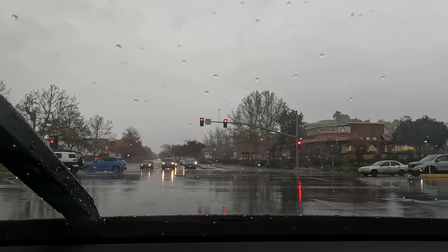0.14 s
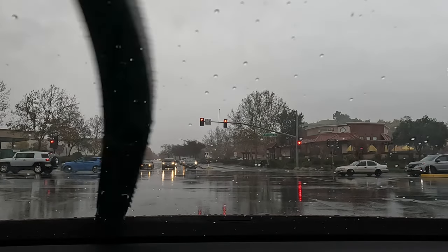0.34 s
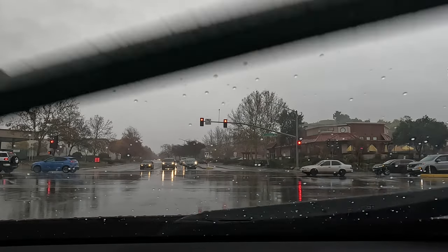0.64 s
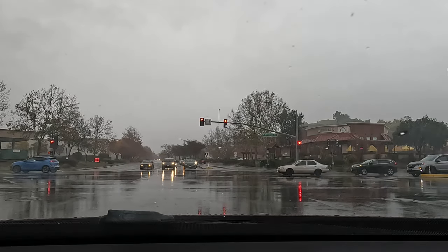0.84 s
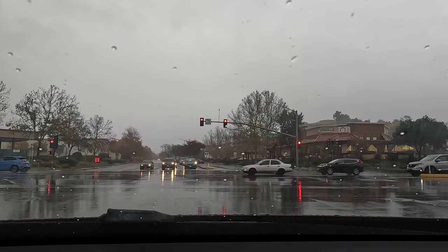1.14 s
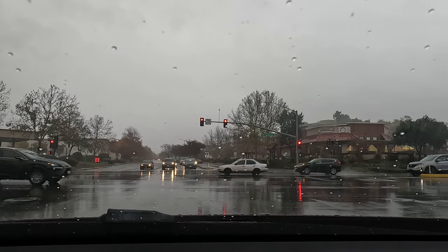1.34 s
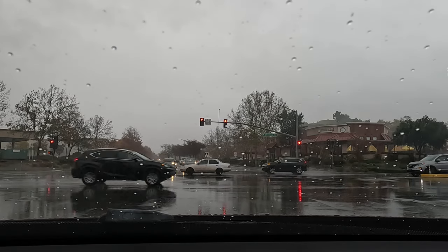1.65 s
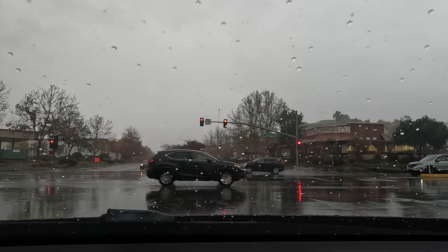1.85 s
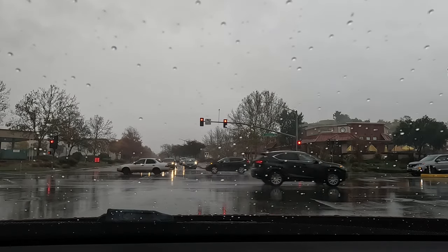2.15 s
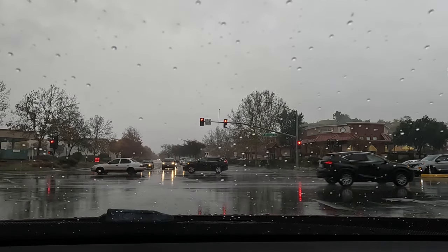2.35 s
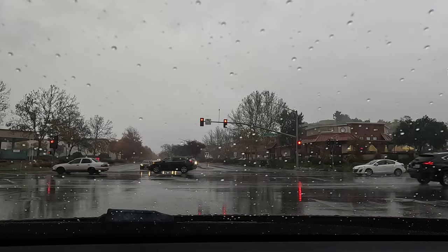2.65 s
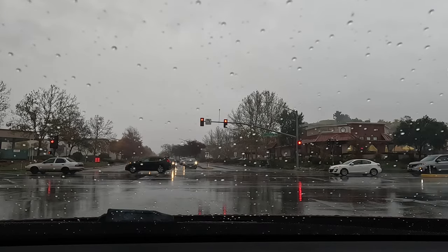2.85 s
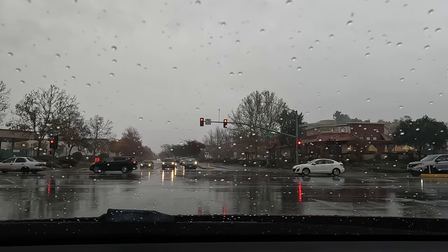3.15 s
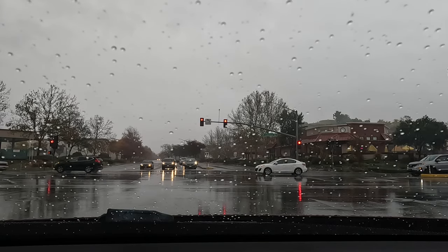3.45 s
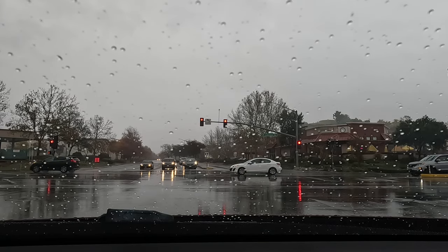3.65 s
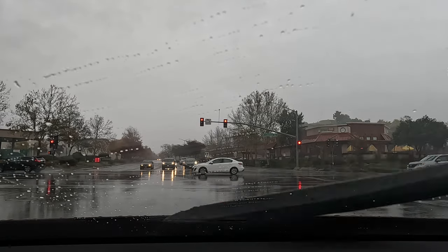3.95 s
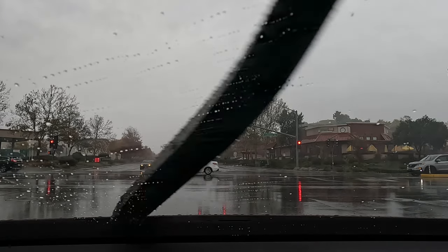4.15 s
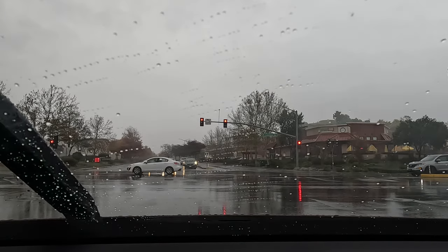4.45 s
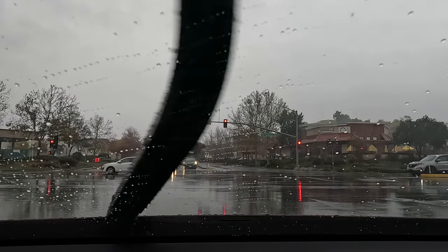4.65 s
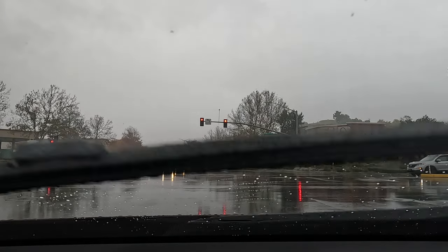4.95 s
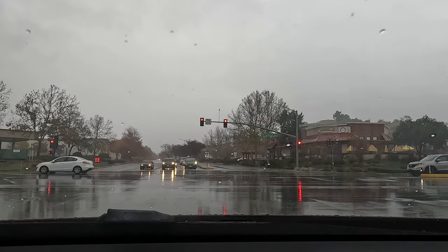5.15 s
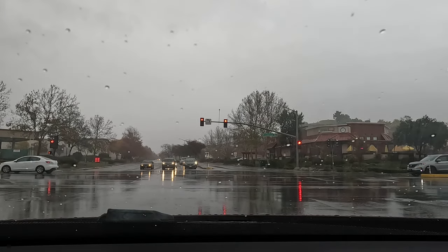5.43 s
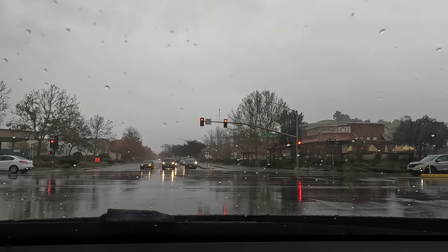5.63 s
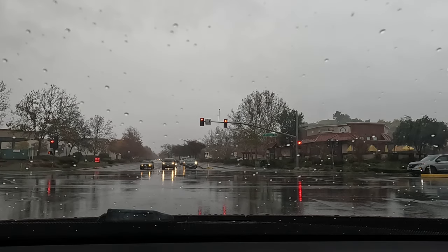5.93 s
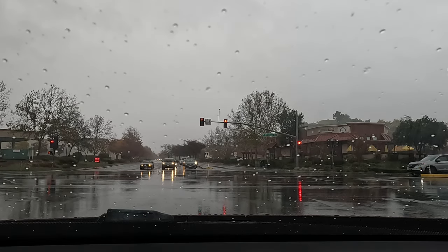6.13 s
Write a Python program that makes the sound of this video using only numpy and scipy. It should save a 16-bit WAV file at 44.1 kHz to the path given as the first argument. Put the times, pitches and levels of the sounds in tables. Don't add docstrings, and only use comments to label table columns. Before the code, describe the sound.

Close stereo cabin sound: deep steady engine hum, muffled airy wash and regular indicator ticks, alternately dull and slightly brighter. Wiper rubber stutters briefly at first and knocks as it settles. After a quiet wait, a loud stroke barks and groans across wet glass, the background dipping beneath it and slowly returning. Small parking knocks follow, then sharp crinkly plastic snaps in a few bursts to the end.

```python
import sys
import numpy as np
from scipy import signal
from scipy.fft import rfft, irfft, next_fast_len
from scipy.io import wavfile
from scipy.ndimage import uniform_filter1d

SR = 44100
rng = np.random.default_rng(int(sys.argv[2]) if len(sys.argv) > 2 else 0)


def transcribe(signal):
    frames = np.atleast_2d(signal).T
    limited = np.clip(frames, -1, 1)
    pcm = np.round(limited * 32767).astype(np.int16)
    wavfile.write(sys.argv[1], SR, pcm)


def voltage_ratio(level):
    return 10 ** (np.asarray(level, float) / 20)


N = 277389
PADDED = next_fast_len(N)
OPPOSED = np.array([[1], [-1]])

# time [s], pitch [Hz], level [dB].
GROAN = [
    (4.245, 225.6, -24.5),
    (4.275, 213.3, -19),
    (4.298, 185.2, -12),
    (4.325, 177.2, -13.5),
    (4.365, 205, -14.5),
    (4.41, 185.4, -13),
    (4.44, 201.1, -17),
    (4.465, 219.3, -21),
    (4.52, 210, -29.5),
]
# start [s], length [s], from [Hz], to [Hz], level [dB].
HEEL_NOTES = [
    (.162, .06, 198.5, 192.6, -21.5),
    (4.148, .075, 190.1, 183.7, -16),
    (4.23, 0.017, 214.4, 233, -12),
]
# start [s], length [s], from [Hz], to [Hz], level [dB].
SQUEAKS = [
    (3.955, .062, 343.6, 320.7, -22.5),
]


def rms_one(x):
    return x / np.sqrt(np.mean(x ** 2) + 1e-20)


def in_time(rows, silent=None):
    s, *columns = np.transpose(rows)
    return [np.interp(np.arange(N) / SR, s, c, silent, silent) for c in columns]


def at_hz(points, hz):
    point_hz, value = np.transpose(points)
    return np.interp(np.log(hz), np.log(point_hz), value)


def drift(rate):
    r = np.exp(-80 * np.pi * rate / SR)
    slow = signal.lfilter([1], [1, -2 * r, r * r], rng.standard_normal(N // 40 + 2002))[2000:]
    return np.interp(np.arange(N) / 40, np.arange(len(slow)), rms_one(slow - slow.mean()))


def band(x, low_hz, high_hz):
    sos = signal.butter(2, [low_hz, min(high_hz, .45 * SR)], "band", fs=SR, output="sos")
    return signal.sosfilt(sos, x)


def colour(x, spectrum):
    hz = np.maximum(np.fft.rfftfreq(PADDED, 1 / SR), 1)
    return irfft(rfft(x, PADDED) * voltage_ratio(at_hz(spectrum, hz)), PADDED)[..., :N]


def lifted(x, peaks):
    hz = np.fft.rfftfreq(PADDED, 1 / SR)
    lift_db = sum(db / (1 + (2 * (hz - at) / width) ** 2) for at, width, db in peaks)
    return irfft(rfft(x, PADDED) * voltage_ratio(lift_db), PADDED)[..., :N]


def split(x):
    crossovers_hz = [250, 600, 1150, 1800, 2500, 3300, 4800, 6500]
    hz, spectrum = np.fft.rfftfreq(PADDED, 1 / SR), rfft(x, PADDED)
    below = [0 * hz] + [1 / (1 + (hz / edge) ** 4) for edge in crossovers_hz] + [0 * hz + 1]
    return [rms_one(irfft(spectrum * (upper - lower), PADDED)[:N]) for lower, upper in zip(below, below[1:])]


def clicks_at(times, sizes):
    out = np.zeros(N)
    out[np.round(np.array(times) * SR).astype(int)] = sizes
    return out


def panned(x, lean_db):
    return np.array([x * voltage_ratio(lean_db / 2), x * voltage_ratio(-lean_db / 2)])


def held(rows, attack_s, release_s):
    t = np.arange(N) / SR - np.array(rows)[:, :1]
    length = np.array(rows)[:, 1:2]
    return np.clip(t / attack_s, 0, 1) * np.exp(-np.maximum(t - length, 0) / release_s)


def buzz(modes, drive_s):
    t = np.arange(4000) / SR
    rise = 1 - np.exp(-t / 0.00059)
    out = 0
    for k, (hz, db, t60) in enumerate(modes):
        level = voltage_ratio(db - 60 * np.maximum(t - drive_s, 0) / t60)
        out = out + level * rise * np.sin(2 * np.pi * hz * t + k * k)
    return out


def engine():
    # frequency [Hz], level [dB rms].
    orders_hz = [(32.3, -28.5), (64.6, -23.5), (129.2, -36), (193.8, -41), (258.4, -55.5), (323.0, -46.5),
                 (479.1, -66.5), (710.6, -60), (769.8, -64), (834.4, -62), (942.1, -63.5)]
    wander_db = 1.4
    turn = 2 * np.pi * np.cumsum(1 + .0006 * drift(1.5)) / SR
    out = 0
    for hz, db in orders_hz:
        out = out + voltage_ratio(db + wander_db * drift(4.3)) * np.sin(hz * turn + 2 * np.pi * rng.random())
    return panned(np.sqrt(2) * out, -.9)


def cabin():
    # frequency [Hz], level [dB per Hz].
    spectrum = [(16, -10.5), (30, -0.5), (46, -12.5), (64, -8.5), (80, -23), (150, -26), (250, -27),
                (450, -36), (1000, -47.5), (2700, -62), (5500, -70.5), (8000, -77.5), (11500, -91),
                (15500, -115)]
    # frequency [Hz], width [Hz], lift [dB].
    hollows = [(22, 2.6, -8), (309.6, 8.7, 7), (782.7, 43, 9.5), (1656, 62, 6), (4260, 2400, 7.5)]
    # frequency [Hz], likeness [0 to 1].
    likeness = [(60, 1), (130, 0.97), (290, 0.97), (640, 0.74), (1410, 0.78), (3100, 0.27), (6820, 0.76),
                (15000, 0.46)]
    # frequency [Hz], left minus right [dB].
    lean_curve = [(60, -1.0), (180, -0.5), (550, -1.5), (1650, -0.5), (4970, -0.5), (15000, 1.0)]
    level_db, patchy_db = -24.5, .8
    noise = lifted(colour(rng.standard_normal((2, 2, N)), spectrum), hollows)
    together = .3 * drift(6)
    edges = 14 * 2 ** np.arange(0, 10.6, .5)
    out = 0
    for k, (low, high) in enumerate(zip(edges, edges[1:])):
        mid, side = band(noise[k % 2], low, high)
        centre = np.sqrt(low * high)
        alike = np.clip(at_hz(likeness, centre), 0, 1)
        pair = np.sqrt(1 + alike) * mid + np.sqrt(1 - alike) * side * OPPOSED
        lean = voltage_ratio(at_hz(lean_curve, centre) / 2 * OPPOSED)
        out = out + voltage_ratio(patchy_db * (together + drift(6.9))) * lean * pair
    return voltage_ratio(level_db) * rms_one(out)


def motor():
    # start [s], length [s], level [dB].
    loads = [(0, 0.084, -23.5), (0.151, .17, -22), (0.442, 0.12, -28), (0.68, .25, -29),
             (0.957, 0.075, -23.5), (3.902, 0.029, -14), (4.093, 0.046, -25), (4.202, 0.068, -23.5),
             (4.485, 0.49, -33), (5.087, 0.15, -32.5), (5.206, 0.084, -25.5)]
    rumble = rms_one(band(rng.standard_normal(N), 78, 149))
    load = voltage_ratio(np.array(loads)[:, 2]) @ held(loads, attack_s=0.014, release_s=0.026)
    return panned(load * rumble, -.9)


def glides(notes):
    return [[(s, from_hz, db), (s + length, to_hz, db)] for s, length, from_hz, to_hz, db in notes]


def singing(rows, glass, count):
    hz, db = in_time(rows)
    t = np.arange(N) / SR
    fade = np.clip(np.minimum(t - rows[0][0], rows[-1][0] - t) / .012, 0, 1)
    turn = 2 * np.pi * np.cumsum(hz) / SR
    partials = sum(voltage_ratio(db + at_hz(glass, k * hz)) * np.cos(k * turn) for k in range(1, count + 1))
    return panned(fade * np.sqrt(2) * partials, -.5)


def songs():
    # time [s], pitch [Hz], level [dB].
    whine = [
        (0, 491, -31.5),
        (.05, 471, -39),
        (.1, 455, -38),
    ]
    # start [s], length [s], from [Hz], to [Hz], level [dB].
    tip_notes = [
        (.14, 0.042, 329.7, 315, -21),
        (.21, 0.077, 328, 324.3, -21),
        (4.1, 0.089, 324, 333, -22),
        (4.17, 0.067, 340, 326.4, -20.5),
    ]
    # frequency [Hz], level [dB].
    heel_glass = [(195, 4), (225, 3.5), (370, -5.5), (440, -4.5), (548, -7), (610, -16), (730, -15),
                  (900, -30)]
    tip_glass = [(330, -2.5), (660, -15), (990, -15.5), (1330, -20)]
    dry_glass = [(330, 0), (660, -2), (990, 0), (1330, -6), (1700, -12), (2000, -22)]
    heel = sum(singing(rows, heel_glass, count=5) for rows in glides(HEEL_NOTES) + [GROAN])
    tip = sum(singing(rows, tip_glass, count=4) for rows in glides(tip_notes))
    squeak = sum(singing(rows, dry_glass, count=6) for rows in glides(SQUEAKS))
    gear = singing(whine, [(1, 0.011)], count=1)
    return heel + tip + squeak + gear


def slips():
    loose_per_s, loose_uneven, heel_uneven, clean_uneven = 180, .45, .14, .03
    per_s, uneven = np.full(N, float(loose_per_s)), np.full(N, loose_uneven)
    sung = [(glides(SQUEAKS), clean_uneven), (glides(HEEL_NOTES), heel_uneven), ([GROAN], clean_uneven)]
    for curves, locked in sung:
        for rows in curves:
            hz = in_time(rows, 0)[0]
            per_s = np.where(hz > 0, hz, per_s)
            uneven = np.where(hz > 0, locked, uneven)
    return per_s, uniform_filter1d(uneven, size=400)


def blade():
    # frequency [Hz], level [dB per Hz].
    friction = [(60, -28), (124, 11.5), (292, 10), (488, -4.5), (850, -12.5), (1400, -21.5), (2700, -40),
                (4200, -49.5), (5500, -54), (7600, -63.5), (10000, -76), (15500, -97.5)]
    # frequency [Hz], width [Hz], lift [dB].
    rubber = [(1097, 130, 1.5), (1416, 91, 4), (1680, 150, 3.5), (2494, 190, 4.5), (3750, 600, 5),
              (4700, 500, 6), (6200, 700, 1)]
    # start [s], length [s], rasp [dB],
    # weight on the glass [dB re rasp], wet hiss [dB re rasp].
    bites = [(0.057, 0.065, -53.5, 11, -14), (0.139, 0.024, -44, 13, -1), (0.166, .03, -38, 12, 0.5),
             (0.196, 0.036, -42.5, 14, -18), (0.247, 0.026, -44.5, 18, -4), (3.893, 0.044, -35, 16, -13),
             (3.963, 0.044, -32.5, 20.5, -17.5), (4.016, 0.059, -30.5, 9.5, -18.5),
             (4.078, 0.078, -29.5, 11, -17), (4.167, 0.04, -40, 19.5, -6), (4.217, 0.029, -35.5, 15, -9),
             (4.253, 0.076, -35.5, 21, -8), (4.342, 0.069, -37, 20.5, -4.5), (4.413, 0.058, -36, 15, -10),
             (4.515, .015, -43.5, 17, -6)]
    sharp, jolt, slip_db, grip_db = 0.95, 0.29, 2.5, 4.0
    thrum_db, scrape_db, scrape_weight = -0.5, 1.1, 0.33
    sheen_db, spray_db, fastest_s, fastest_span_s = -17, 19.5, 4.09, 0.17
    upstroke_s, lean_start_db, lean_db_per_s, lean_top_db = 3.88, -1, 25.5, 10

    per_s, uneven = slips()
    cycles = np.cumsum(per_s * np.exp(uneven * drift(60))) / SR
    spread_db = np.clip(3 * uneven + .3, 0, 1) * slip_db
    strength = voltage_ratio(spread_db * rng.standard_normal(3000)[cycles.astype(int)])
    decay = sharp + 2 * np.exp(-8.0 * uneven)
    puff = strength * np.exp(-decay * (cycles % 1)) * rng.standard_normal((2, N))
    let_go = np.diff(np.floor(cycles), prepend=0) > 0
    jolts = strength * (.5 + 1.3 * np.exp(-8 * uneven)) * let_go
    mix = rms_one(puff) + jolt * rms_one(jolts) * [[1], [0]]
    main, other = lifted(colour(mix, friction), rubber)

    spells = held(bites, attack_s=0.014, release_s=0.015)
    _, _, db, weight_db, wet_db = np.transpose(bites)
    body = voltage_ratio(db + weight_db) @ spells
    scrape = voltage_ratio(db + scrape_db + scrape_weight * weight_db) @ spells
    rasp = voltage_ratio(db) @ spells
    hiss = voltage_ratio(db + wet_db) @ spells
    loose = np.clip(3 * uneven + .2, 0, 1)
    t = np.arange(N) / SR
    sheen = hiss * voltage_ratio(sheen_db + spray_db * np.exp(-((t - fastest_s) / fastest_span_s) ** 2))
    rising_db = np.minimum(lean_start_db + lean_db_per_s * (t - upstroke_s), lean_top_db)
    lean_db = np.where(t < upstroke_s, lean_top_db, rising_db)

    gains = [voltage_ratio(thrum_db) * body * np.sqrt(loose), body * loose, scrape * np.sqrt(loose), rasp,
             voltage_ratio(-11.0) * rasp, voltage_ratio(-8.5) * hiss, voltage_ratio(-5.5) * hiss, voltage_ratio(-10.5) * hiss, sheen]
    shares = [0.1, 0.18, 0.68, 0.67, 1.0, 0.9, 0.4, 1.0, 0.9]
    sides_db = [-18.5, -14, -6.5, -6.5, -17.5, -1.5, -6.5, -7.5, -6.5]
    out = 0
    for gain, mid, side, share, side_db in zip(gains, split(main), split(other), shares, sides_db):
        gripped = gain * voltage_ratio(share * grip_db * drift(19))
        out = out + gripped * (panned(mid, share * lean_db - .9) + voltage_ratio(side_db) * side * OPPOSED)
    return out


def knocks():
    # time [s], peak [dB], thud [dB re peak], top [dB re peak], left minus right [dB].
    hits = [(0.071, -43.5, 12, -7, 18), (0.1027, -43, 25.5, -31, 7), (0.3686, -35, 19, -17.5, 8),
            (0.6004, -47, 5, -11, 4), (0.94, -40.5, 13, -3, -4), (0.96, -40, 21, -6, 1.5),
            (0.9959, -43.5, 23.5, -28.5, 1), (1.0167, -35, 0, -10, -7.5), (1.028, -39.5, -5, -6, 3),
            (3.8206, -30.5, 11, -34, -3), (3.9, -29, 19, -2, -4), (4.6187, -48.5, 21, -38, 8),
            (4.8525, -48, 2, -12, 4), (5.1984, -42.5, 9, -22, 0), (5.2443, -38.5, 12, -14, 2),
            (5.2549, -45, 22, -53, -4)]
    # frequency [Hz], level [dB], T60 [s].
    linkage = [(1020, 1, 0.036), (1370, -5.5, .035), (1572, -1.5, 0.041)]
    knock_hz = 1120
    out, t = np.zeros((2, N)), np.arange(6000) / SR
    ring = voltage_ratio(-9.5) * buzz(linkage, drive_s=0.0055)
    rise = 1 - np.exp(-t / 0.00076)
    for s, db, thud_db, top_db, lean_db in hits:
        i = round(s * SR)
        out[:, i:i + len(ring)] += panned(voltage_ratio(db) * ring, lean_db)
        ranges = [(110, 500, .1, thud_db - 6, .1),
                  (knock_hz / 1.7, knock_hz * 1.5, .06, -1.5, 1),
                  (1800, 4200, .03, top_db + 0.5, 1)]
        for low, high, t60, rel_db, share in ranges:
            dying = voltage_ratio(-60 * t / t60) * rise * np.sqrt(SR / 2 / (high - low))
            burst = band(rng.standard_normal(len(t)) * dying, low / 1.6, high * 1.14)
            burst = voltage_ratio(db + rel_db) * band(burst, low, high)
            out[:, i:i + len(t)] += panned(burst, share * lean_db)
    return out


def wrapper():
    # time [s], peak [dB], centre [Hz], left minus right [dB].
    snaps = [(0.071, -54.5, 5500, 9), (0.369, -53, 5200, 4), (0.5994, -51, 4800, -2),
             (0.731, -57.5, 7400, 3), (4.8533, -47.5, 6000, 2), (5.245, -43, 7800, 5),
             (5.364, -39, 4500, 13), (5.396, -34.5, 4370, 11), (5.4109, -30.5, 4600, 2.5),
             (5.4382, -42, 5270, 5.5), (5.443, -26, 5470, 2), (5.459, -34.5, 4420, -4),
             (5.4638, -35, 5720, 8.5), (5.4704, -34, 4630, 28), (5.476, -24, 5600, -0.5),
             (5.6398, -47, 4400, -11), (5.8462, -50, 3920, 12), (5.9, -46.5, 4260, 18),
             (5.914, -36, 4000, 0), (5.934, -33.5, 4500, 6.5), (5.9584, -39.5, 4800, 2),
             (5.9944, -44.5, 3960, 8), (6.1175, -42, 3540, 8), (6.2484, -27, 8260, 3)]
    # start [s], length [s], level [dB].
    rustle = [
        (5.355, 0.045, -61),
        (5.394, .03, -50),
        (5.464, .11, -53),
        (5.898, 0.095, -67),
        (6.237, 0.016, -48.5),
        (6.29, .02, -60.5),
    ]
    # frequency [Hz], level [dB per Hz].
    crinkle = [(800, -33), (1400, -2), (3000, -14), (4000, -5.5), (5600, -4.5), (8000, -11.5), (11000, -24),
               (15800, -34)]
    per_s, size_db, tail_db = 2500, 2.0, -10
    sizes = voltage_ratio(size_db * np.minimum(rng.exponential(1, (2, N)), 5)) * rng.choice([-1, 1], (2, N))
    crackles = sizes * (rng.random((2, N)) < per_s / SR)
    grains = rms_one(colour(crackles + .2 * rng.standard_normal((2, N)), crinkle))
    bed = voltage_ratio(np.array(rustle)[:, 2]) @ held(rustle, attack_s=0.014, release_s=.015)
    out = panned(bed * grains[0], 1.5) + .4 * bed * grains[1] * OPPOSED
    hiss = rms_one(colour(rng.standard_normal((2, N)), crinkle))
    wide_hiss = hiss[0] + 0.64 * hiss[1] * OPPOSED
    for s, db, hz, lean_db in snaps:
        i = round(s * SR)
        t = np.arange(min(N - i, 3000)) / SR
        rise = 1 - np.exp(-t / 0.00038)
        snap = 2 * np.sin(2 * np.pi * hz * t) * np.exp(-t / 0.00063) * rise
        tail = voltage_ratio(tail_db) * wide_hiss[:, i:i + len(t)] * np.exp(-t / 0.0065) * rise
        out[:, i:i + len(t)] += voltage_ratio(db) * (panned(snap, lean_db) + tail)
    return out


def indicator():
    blinks = [0.317, 0.657, 0.992, 1.325, 1.677, 2.008, 2.347, 2.694, 3.029, 3.377, 3.715, 4.056, 4.397,
              4.737, 5.069, 5.405, 5.76, 6.096]
    # frequency [Hz], level [dB], T60 [s].
    low_ring = [(498, 1, 0.045), (1334, -15, 0.011)]
    bright_ring = [(4610, 1, 0.035), (4740, -7.5, 0.09), (5040, -7.5, .025), (5500, -15, .02),
                   (4450, -3.5, 0.039)]
    # frequency [Hz], level [dB per Hz].
    contact_spectrum = [(500, -22.5), (1300, -7), (2600, -8), (4500, -12), (6500, -30), (9600, -22),
                        (15500, -44.5)]
    s = np.array(blinks)
    low_db = np.full(len(s), -33.0)
    bright_db = np.resize([-71.5, -48.5], len(s))

    def dying(db, t60):
        return signal.lfilter([1], [1, -voltage_ratio(-60 / (t60 * SR))], clicks_at(s - .0015, voltage_ratio(db)) + 1e-18)

    low = signal.fftconvolve(clicks_at(s - .002, voltage_ratio(low_db + 1)), buzz(low_ring, drive_s=0.0056))[:N]
    bright_clicks = clicks_at(s - .002, voltage_ratio(bright_db + 3.0))
    bright = signal.fftconvolve(bright_clicks, buzz(bright_ring, drive_s=0.0071))[:N]
    contact = rms_one(colour(rng.standard_normal(N), contact_spectrum)) * dying(low_db - 18.5, 0.094)
    rattle = band(rng.standard_normal(N) * dying(bright_db + 11.0, .1), 4100, 5200)
    return panned(low + bright + uniform_filter1d(contact, size=2) + rattle, .5)


def scene():
    # start [s], length [s], depth [dB].
    ducks = [
        (0.059, 0.21, 1.5),
        (3.903, 0.5, 6.5),
    ]
    rest_db = 2
    duck_db = np.array(ducks)[:, 2] @ held(ducks, attack_s=0.58, release_s=0.78)
    gain = voltage_ratio(rest_db - duck_db)
    return gain * (engine() + cabin() + indicator()) + blade() + motor() + knocks() + songs() + wrapper()


def roll_off(x):
    return signal.sosfilt(signal.butter(12, 15690, fs=SR, output="sos"), x)


def record(dry):
    fade_in = np.clip(np.arange(N) / (.006 * SR), 0, 1)
    mix = 1.021 * np.tanh(fade_in * dry / 1.39)
    return roll_off(mix)


dry = scene()
out = record(dry)
transcribe(out)
```